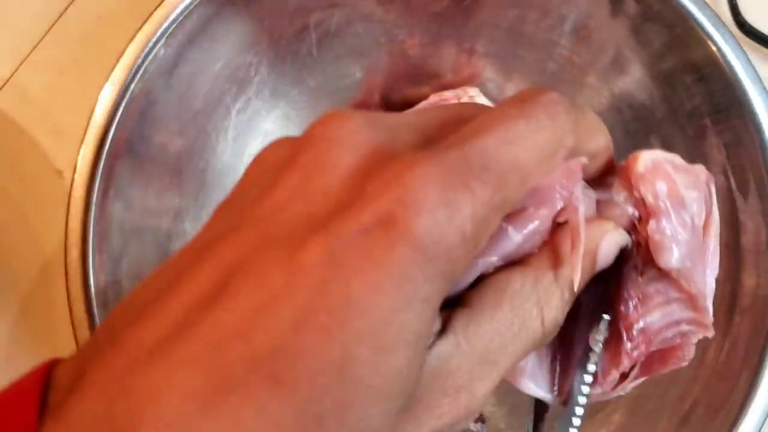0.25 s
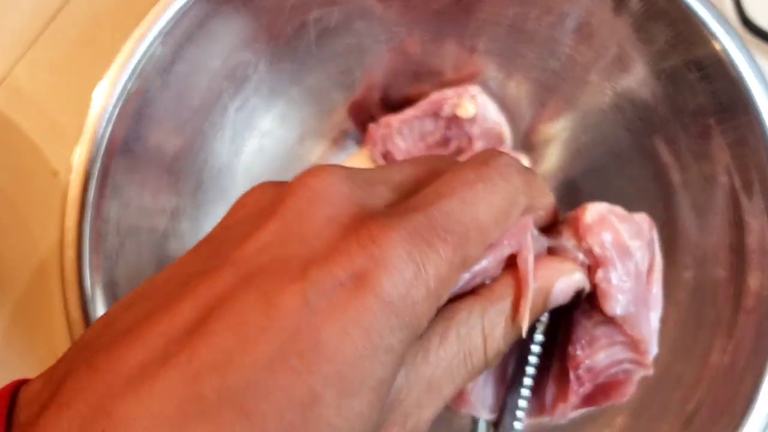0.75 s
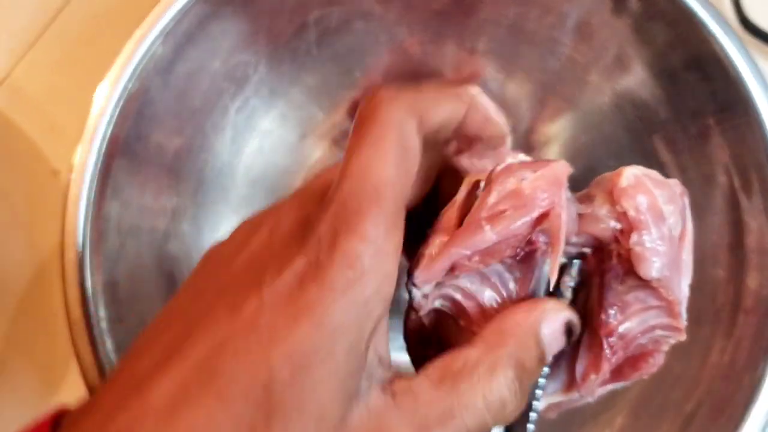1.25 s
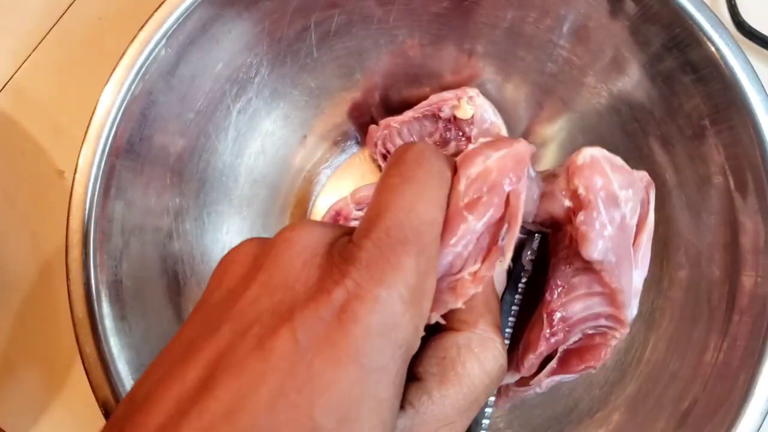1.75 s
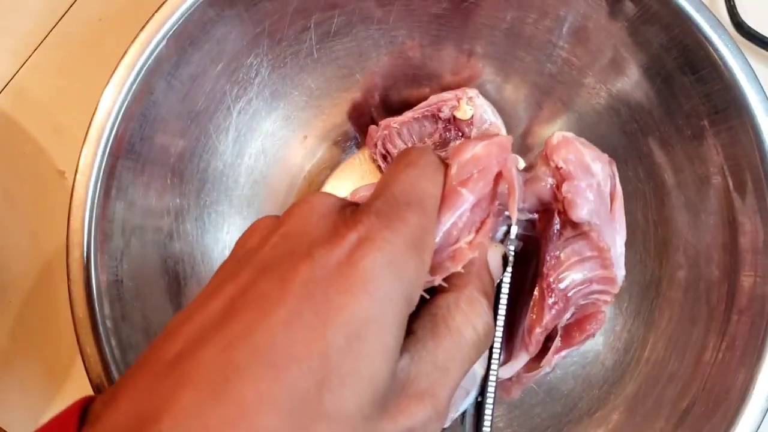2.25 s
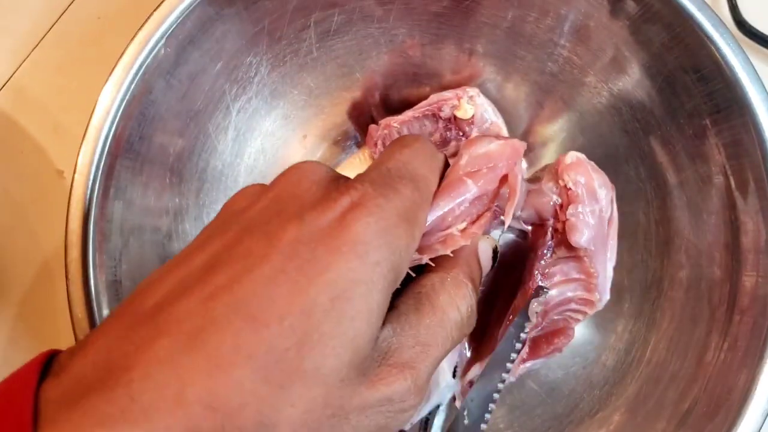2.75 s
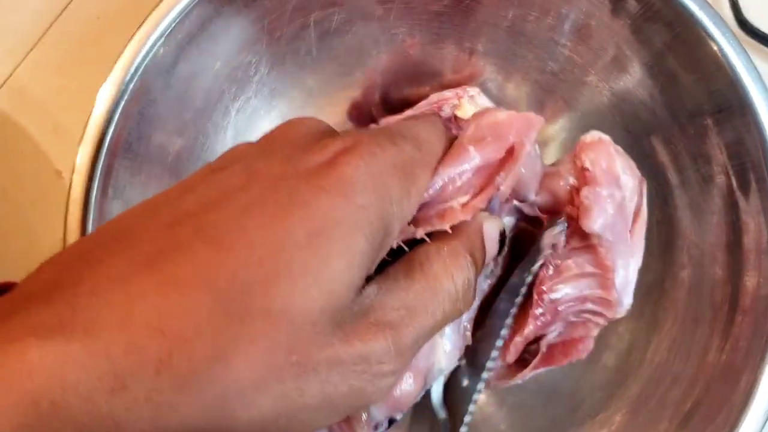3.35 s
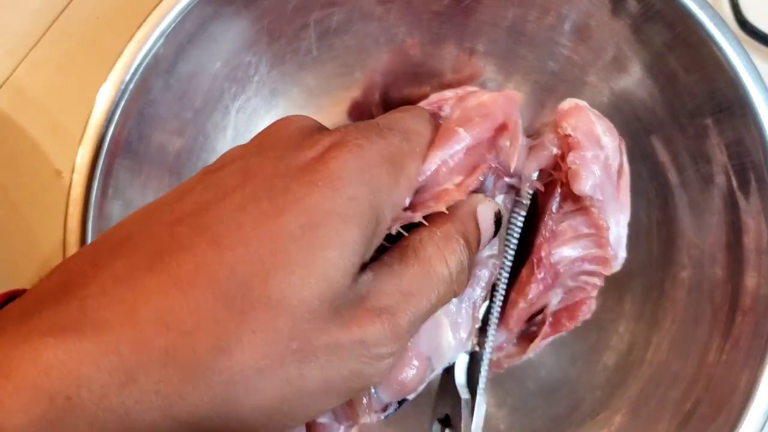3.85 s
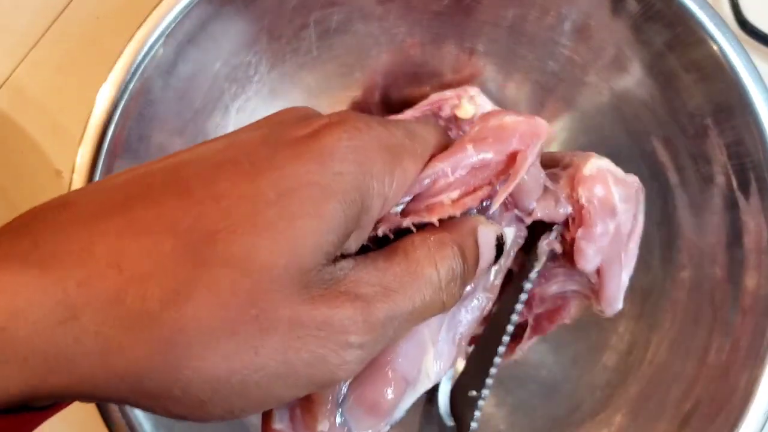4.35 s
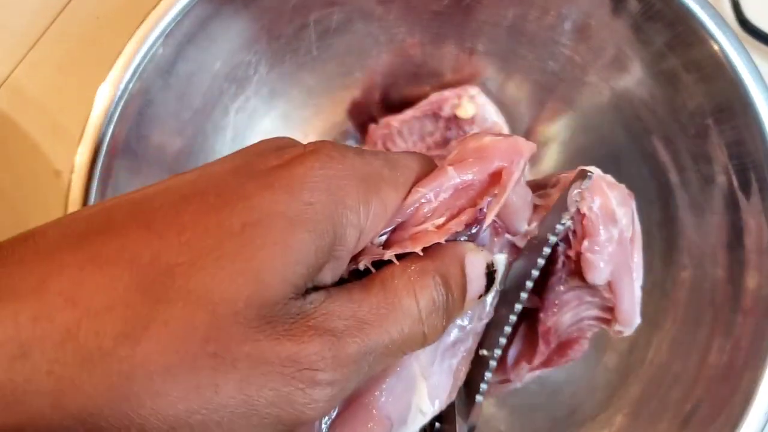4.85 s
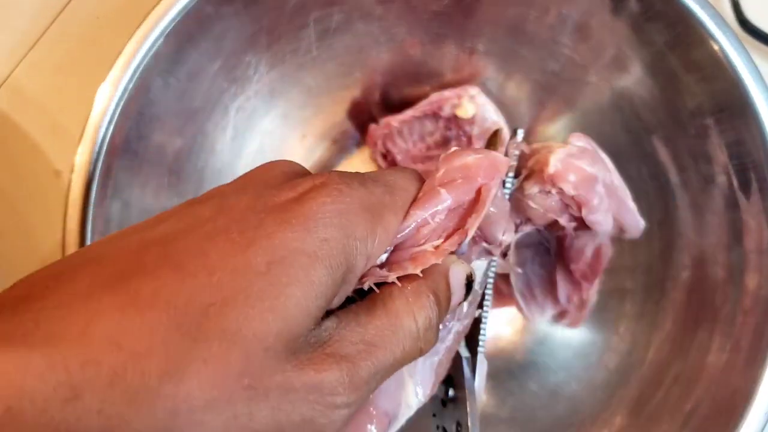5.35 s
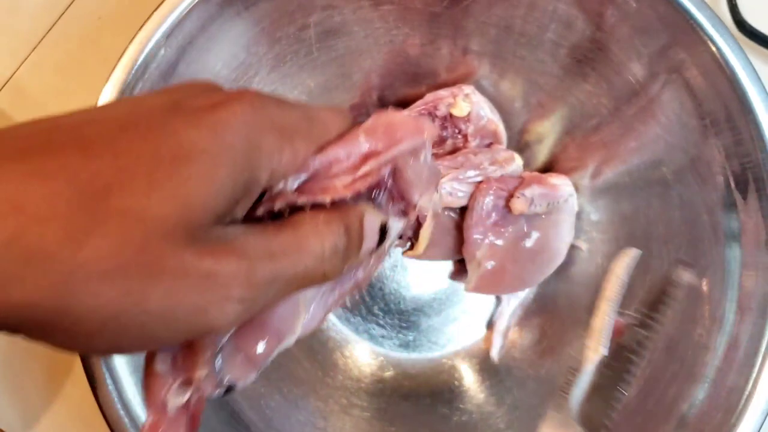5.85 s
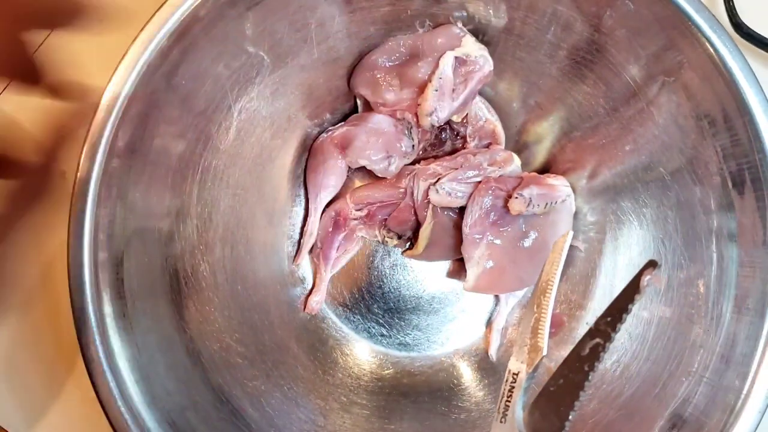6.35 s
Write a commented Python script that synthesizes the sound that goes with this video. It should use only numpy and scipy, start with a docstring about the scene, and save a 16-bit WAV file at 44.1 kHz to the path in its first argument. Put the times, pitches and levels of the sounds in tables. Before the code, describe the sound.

Close up in a small kitchen, shears cut a raw bird over a steel bowl. Bone crackles and ends in a sharp, loud snap; two more cuts follow with gristly crunches, small wet ticks and a final blade clack. A piece flops into the bowl, which rings briefly, and the rest of the bird drops softly beside it. Soft air and a low appliance hum run underneath.

```python
"""Cutting up a raw bird with kitchen shears

Over soft air and a motor's hum, three cuts crackle as bone gives, and each ends in a loud snap; wet flesh squishes.
The cut piece flops into a steel bowl and sets it ringing, then the rest of the bird drops beside it.
Cracks and squishes are shaped noise, thuds are damped pushes, and bone, blades and bowl are fading tones.
A small room's reflections surround the close sounds, and a limiter holds down the loudest moments."""
import sys
import numpy as np
from scipy import signal
from scipy.fft import rfft, irfft, next_fast_len
from scipy.io import wavfile
from scipy.ndimage import uniform_filter1d

SR = 44100
rng = np.random.default_rng(int(sys.argv[2]) if len(sys.argv) > 2 else 0)


def output_pcm(signal):
    """Save a mono or channel-first signal as 16-bit PCM at the path in sys.argv[1].

    Samples are clipped to [-1, 1] before scaling.
    """
    pcm = np.clip(np.atleast_2d(signal).T, -1, 1) * 32767
    wavfile.write(sys.argv[1], SR, np.round(pcm).astype(np.int16))


N = 291263  # length of the scene in samples
SIZE = 16384  # length of one short sound in samples
BINS = np.fft.rfftfreq(SIZE, 1 / SR)  # its frequencies in Hz
TIME = np.arange(SIZE) / SR  # its clock in seconds
MS = TIME * 1000  # the same clock in milliseconds

# The tone colour of splintering bone and wet friction.
# Each row: frequency in Hz, relative level in dB.
SPLINTER_COLOUR = [(40, -20), (100, -12.5), (250, -15), (420, -5.5), (650, -5), (1000, -10.5), (1800, -6),
                   (2300, 2), (2800, -3), (3600, -4.5), (6200, -4), (7500, -10), (9200, 6.5), (12000, 4),
                   (15500, -0.5)]
# The snap that ends each cut: the bone splits, and just after it the blades slam shut.
# Each row: start in seconds, relative level in dB, decay in ms, treble in dB, clack of the blades in dB,
# pitch of the clack as a ratio, how much earlier the split comes in ms, relative level of the split in dB.
CUT_SNAPS = [(2.5101, -7.5, 2.86, -7, -16, 1.14, 9.3, -30), (3.9560, -12, 2.6, -9, -17, 1, 5, -17),
             (5.4711, -12.5, 2.5, -11.5, -4.5, 1, 6.7, -20)]


def amp(db):
    """Turns decibels into a gain."""
    return 10 ** (np.asarray(db) / 20)


def unit(x):
    """Scales to an rms (average strength) of 1."""
    return x / np.sqrt(np.mean(x ** 2) + 1e-30)


def read(points, hz):
    """Reads a table of (Hz, value), joined by lines on a log-frequency axis."""
    f, value = np.transpose(points)
    return np.interp(np.log(hz + 1), np.log(f), value)


def add(mix, s, sound):
    """Mixes a sound in at time s, cutting it off at the end of the scene."""
    part = mix[:, round(s * SR):][:, :sound.shape[-1]]
    part += sound[..., :part.shape[1]]


def pan(db):
    """Gives left and right gains; db is how much louder the left is."""
    return amp(np.array([[db], [-db]]) / 2)


def pair(likeness, size=SIZE):
    """Makes two channels of white noise that are partly alike (0 = separate, 1 = the same)."""
    shared = rng.standard_normal(size)
    own = rng.standard_normal((2, size))
    likeness = np.clip(likeness, 0, 1)
    return np.sqrt(likeness) * shared + np.sqrt(1 - likeness) * own


def colour(x, gain):
    """Filters with the shape of gain on BINS, never sounding ahead of time; white noise keeps its power."""
    log_gain = np.log(np.maximum(unit(gain), 1e-5))
    circle = np.concatenate([log_gain, log_gain[-2:0:-1]])
    # the Hilbert transform finds the phase that makes the filter respond as early as it can
    response = np.exp(np.conj(signal.hilbert(circle)))[:len(BINS)]
    filtered = irfft(rfft(x) * response)
    return filtered * (TIME < TIME[-1] / 2)


def burst(envelope, likeness):
    """Makes noise under an envelope, with its energy spread evenly over frequency."""
    z = rfft(pair(likeness) * envelope)
    z /= np.sqrt(uniform_filter1d(abs(z) ** 2, size=280, axis=1) + 1e-12)
    return unit(irfft(z)) * np.sqrt(np.mean(envelope ** 2))


def splinter(grain_db, order):
    """An uneven gain that changes over about order samples, as fibres give one after another."""
    grain = unit(uniform_filter1d(rng.standard_normal(SIZE), size=order))
    return unit(amp(grain_db * grain))


def background(air_db=-77.5, air_pan_db=2, hum_pan_db=3):
    """Soft room air is shaped noise; an appliance motor hums in sines whose phase wanders slowly."""
    # Each row: frequency in Hz, relative level in dB per Hz.
    air_colour = [(25, -38.5), (40, -17.5), (55, -3.5), (80, -11.5), (130, -12.5), (280, -15.5),
                  (480, -18.5), (1100, -29), (2000, -31.5), (4500, -34.5), (7500, -44), (10000, -32.5),
                  (14800, -27.5), (16000, -37.5)]
    # Each row: frequency in Hz, likeness of left and right from 0 to 1.
    air_likeness = [(50, 1), (400, 0.28), (1500, 0.11), (5000, 0.038), (14000, .2)]
    # Each row: frequency in Hz, rms level in dB before panning.
    hum_lines = [(53.8, -70.5), (107.7, -85.5), (263.8, -88.5), (360.4, -77), (422, -89.5), (479.1, -91.5)]
    size = next_fast_len(N)
    hz = np.fft.rfftfreq(size, 1 / SR)
    t = np.arange(N) / SR

    left, other = rfft(rng.standard_normal((2, size)))
    same = np.clip(read(air_likeness, hz), 0, 1)
    right = same * left + np.sqrt(1 - same ** 2) * other
    z = np.array([left, right]) * amp(read(air_colour, hz))
    hiss_rms = irfft(z * (hz > 600), size).std()  # the air's level is set by its part above 600 Hz
    air = irfft(z, size)[:, :N] / hiss_rms * amp(air_db) * pan(air_pan_db)

    knots = np.linspace(0, t[-1], 30)
    hum = np.zeros(N)
    for line_hz, db in hum_lines:
        drift = np.interp(t, knots, np.cumsum(.5 * rng.standard_normal(len(knots))))
        hum += np.sqrt(2) * amp(db) * np.sin(2 * np.pi * line_hz * t + drift)
    return air + hum * pan(hum_pan_db)


def fractures():
    """Lists all bursts: start in s, level in dB, decay in ms, knock, treble and left-right balance in dB."""
    # Sharp cracks of bone, gristle and steel.
    # Each row: start in seconds, relative level in dB, decay in ms, treble in dB.
    sharp_cracks = [ (0.8492, -56.5, 2.14, -12), (1.9396, -52, 3, -9.5), (1.953, -41, 2.2, -8),
                    (1.978, -33, 2.3, -2.5), (2.015, -48, 4.5, -1.5), (2.0648, -48, 2.5, 5),
                    (2.07, -30.5, 3.2, -4), (2.122, -31, 6, -7.5), (2.1311, -30, 3.9, 4.5),
                    (3.6379, -23.5, 1.7, 4), (3.716, -32, 2.7, 0), (3.7784, -24.5, 2.9, 6.5),
                    (3.8048, -26, 5, 0.5), (3.8212, -25.5, 7, 0), (3.8314, -28, 1.3, 8.5),
                    (5.0339, -58.5, 3.9, 0), (5.5285, -34.5, 2.1, -4.5), (5.6105, -45, 1.8, -20.5),
                    (5.9459, -45, 4.8, 5)]
    # Wet ticks of tearing skin and flesh.
    # Each row: start in seconds, relative level in dB, treble in dB.
    wet_ticks = [(1.215, -53, 26), (3.073, -51.5, 19.5), (3.2757, -54, 4.5), (3.598, -48.5, 11),
                 (4.182, -39.5, 9), (4.217, -40.5, 8.5), (5.2706, -52.5, 9.5), (5.277, -46.5, 5.5),
                 (5.3205, -52.5, 4), (5.344, -36.5, 9.5), (5.3526, -37.5, 11), (5.373, -50.5, 10)]
    faint_lead_ms, faint_db = 2.3, -30.5  # a very faint crackle shortly before each split
    trail_ms, trail_db = 35, -12  # two weaker ticks trail each tick within this time

    for s, db, decay_ms, treble_db, _, _, lead_ms, split_db in CUT_SNAPS:
        split = 3, -4.5, 4.5, 11  # decay ms, then knock, treble and left-right dB
        yield s - (lead_ms + faint_lead_ms) / 1000, split_db + faint_db, *split
        yield s - lead_ms / 1000, split_db, *split
        yield s, db, decay_ms, -4, treble_db, 1
    for s, db, decay_ms, treble_db in sharp_cracks:
        knock_db = -2 - 0.83 * treble_db  # the duller a crack, the more it knocks
        yield s, db, decay_ms, knock_db, treble_db, 2
    for s, db, treble_db in wet_ticks:
        wet = 3.1, -1, treble_db, 5.5  # decay ms, then knock, treble and left-right dB
        yield s, db, *wet
        for late_ms in trail_ms * rng.random(size=2):
            yield s + late_ms / 1000, db + trail_db, *wet


def cracks(likeness=0.68, knock_hz=1150, treble_hz=6000, rise_ms=.3):
    """Each burst is a few milliseconds of splintering, coloured by bone and blades."""
    out = np.zeros((2, N))
    knock = 1 / (1 + (BINS / knock_hz) ** 4)
    treble = 1 - 1 / (1 + (BINS / treble_hz) ** 4)
    for s, db, decay_ms, knock_db, treble_db, pan_db in fractures():
        smooth = (1 - np.exp(-MS / rise_ms)) * np.exp(-MS / decay_ms)
        # the grain roughens the envelope but leaves its overall strength alone
        envelope = unit(smooth * splinter(grain_db=5.5, order=14)) * np.sqrt(np.mean(smooth ** 2))
        gain = amp(read(SPLINTER_COLOUR, BINS) + knock_db * knock + treble_db * treble)
        add(out, s, amp(db) * pan(pan_db) * colour(burst(envelope, likeness), gain))
    return out


def squishes(likeness=0.055, grain_db=5, pan_db=3, squeak_width=0.123):
    """Wet flesh sticks and slips: a grainy swell with one squeaky resonance over a broad hiss."""
    # Wet flesh sliding on the blades and bowl.
    # Each row: start in seconds, length in seconds, rising share of it, relative level in dB,
    # pitch of the squeak in Hz, broad hiss against the squeak in dB.
    slides = [(0.911, 0.07, 0.22, -67.5, 9650, 7), (1.841, 0.061, 0.49, -63.5, 10100, -4),
              (2.746, 0.073, 0.31, -63, 9880, 3), (3.549, 0.063, 0.42, -61.5, 9000, -5),
              (4.149, 0.076, .3, -57, 9600, 16), (5.519, 0.07, 0.091, -31.5, 5940, 0),
              (5.562, 0.15, 0.16, -48.5, 7060, 6.5), (5.733, .11, .5, -59.5, 6050, -6),
              (5.843, 0.114, .36, -62.5, 9520, 16), (6.16, 0.056, .7, -61, 9380, -5),
              (6.254, 0.07, 0.062, -47, 5450, -7), (6.251, 0.081, 0.17, -46, 9950, -18)]
    out = np.zeros((2, N))
    for s, length, rising, db, hz, hiss_db in slides:
        swell = np.interp(TIME / length, [0, np.clip(rising, .05, .95), 1], [0, 1, 0])
        # the width is a share of the squeak's pitch
        squeak = unit(1 / (1 + ((BINS - hz) / (squeak_width * hz)) ** 2))
        hiss = amp(hiss_db) * unit(amp(read(SPLINTER_COLOUR, BINS)))
        grains = burst(swell * splinter(grain_db, order=60), likeness)
        add(out, s, amp(db) * pan(pan_db) * colour(grains, np.hypot(squeak, hiss)))
    return out


def pushes(cycles=0.73, second_slap_db=-30.5):
    """Lists two pushes a thud: start in s, level in dB, pitch in Hz, time to swell in ms, wet slap in dB."""
    # Flesh landing on steel, and the dull jolt of the last snap; each is a first push and then a second.
    # When flesh lands, these are a quick touch and its weight settling.
    # Each row: start in seconds, relative level of the first in dB, its pitch in Hz, its wet slap in dB,
    # delay until the second in ms, relative level of the second in dB, its pitch in Hz.
    thuds = [(1.6996, -51, 440, -12, 26, -56, 146), (5.47, -42.5, 398.4, -25.5, 5.3, -47.5, 78),
             (5.5271, -21, 532, -18.5, 19.4, -41.5, 200.2), (5.6213, -34.5, 970, -2, 28, -63.5, 116),
             (5.687, -46, 364, -16, 13.3, -41.5, 140), (6.279, -36.5, 449, -11.5, 1.53, -38, 61.3),
             (6.2989, -34, 401, -10.5, 1, -38, 118), (6.331, -40, 364, -11, 22, -37.5, 63.5)]
    for s, first_db, first_hz, slap_db, delay_ms, second_db, second_hz in thuds:
        # strong damping: a push swells and fades again within a few cycles
        yield s, first_db, first_hz, 1000 * cycles / first_hz, slap_db
        yield s + delay_ms / 1000, second_db, second_hz, 1000 * cycles / second_hz, second_slap_db


def flops(slap_ms=4, slap_hz=1500, pan_db=1):
    """Flops of soft meat and the last snap's jolt: damped pushes of a few cycles, with a small slap."""
    out = np.zeros((2, N))
    for s, db, hz, swell_ms, slap_db in pushes():
        u = MS / swell_ms
        push = u * np.exp(1 - u) * np.sin(2 * np.pi * hz * TIME)
        slap = colour(burst(np.exp(-MS / slap_ms), 0.16), 1 / (1 + (BINS / slap_hz) ** 2))
        add(out, s, amp(db) * pan(pan_db) * (push + amp(slap_db) * slap))
    return out


def shudder(level_db=-17, decay_ms=45, corner_hz=420, pan_db=2):
    """Each push shakes bowl and counter in a dull, uneven rumble; slower pushes shake more."""
    out = np.zeros((2, N))
    gain = BINS / (BINS + 40) / (1 + (BINS / corner_hz) ** 4)
    for s, db, _, swell_ms, _ in pushes():
        strength = amp(db + level_db) * np.sqrt(swell_ms / 10)
        rumble = colour(pair(0.69) * np.exp(-MS / decay_ms), gain)
        add(out, s, strength * pan(pan_db) * rumble)
    return out


def clacks(pan_db=4, port_turn=0.055):
    """Each knock of bone or click of shears rings briefly, slightly out of step at the two microphone ports."""
    # Bone giving way or knocking on the steel, and a click of the shears.
    # Each row: start in seconds, relative level in dB, pitch in Hz.
    knocks = [(2.1217, -26, 1480), (2.5102, -23, 1200), (3.8048, -20.5, 1555), (5.9459, -52, 2970),
              (6.3005, -29.5, 1010)]
    # What these knocks ring with. Each row: multiple of the pitch, width in Hz, relative level in dB.
    knock_modes = [(1, 290, 2), (.43, 140, -15)]
    # What the shears ring with as they slam shut, before the ratio of each clack.
    # Each row: pitch in Hz, width in Hz, relative level in dB.
    shear_modes = [(460, 230, -16), (2230, 160, -1.5), (2720, 350, -9), (3410, 400, -2.5),
                   (4900, 820, -11.5)]
    out = np.zeros((2, N))
    rings = []
    for s, db, hz in knocks:
        for ratio, width_hz, mode_db in knock_modes:
            rings.append((s, db + mode_db, hz * ratio, width_hz))
    for s, _, _, _, db, ratio, _, _ in CUT_SNAPS:
        for hz, width_hz, mode_db in shear_modes:
            rings.append((s, db + mode_db, hz * ratio, width_hz))
    for s, db, hz, width_hz in rings:
        phase = port_turn * rng.standard_normal((2, 1))  # in cycles
        fade = np.exp(-np.pi * width_hz * TIME)  # a wider resonance dies sooner
        onset = 1 - np.exp(-hz * TIME)
        ring = fade * onset * np.sin(2 * np.pi * (hz * TIME + phase))
        add(out, s, amp(db) * pan(pan_db) * ring)
    return out


def bowl(pan_db=3):
    """The struck steel rings in fading modes, some close in pitch; the loaded bowl bobs after each drop."""
    # Pitches of the bowl's modes in Hz.
    mode_hz = [420, 479, 759, 1836, 1890, 5733, 6002]
    # How each mode rings freely, in the same order.
    # Each row: relative level in dB, time to fall by 60 dB in seconds.
    mode_ring = [(-22.5, 3.95), (-27.5, 2.53), (-29.5, 2.04), (-2, 0.62), (-3, 0.68), (-25, 0.8),
                 (-11.5, 0.75)]
    # Blows on the bowl; meat lying on the steel shortens the ring.
    # Each row: start in seconds, relative level in dB, ring length as a share of the free ring.
    blows = [(5.528, -45, 1), (6.256, -63, .5)]
    # The loaded bowl bobbing on the counter. Each row: start in seconds, relative level in dB.
    bobs = [(5.772, -58), (6.363, -44.5)]
    # Its two ways of bobbing. Each row: pitch in Hz, relative level in dB, time to fall by 60 dB in seconds.
    bob_modes = [(57.7, -3, 0.95), (66.24, -4, 0.69)]
    out = np.zeros((2, N))
    t = np.arange(SR) / SR
    for s, blow_db, share in blows:
        for hz, (db, t60) in zip(mode_hz, mode_ring):
            phase = rng.random() + rng.random((2, 1)) / 4  # left and right up to a quarter cycle apart
            fade = np.exp(-np.log(1000) * t / (t60 * share))
            add(out, s, amp(blow_db + db) * fade * np.sin(2 * np.pi * (hz * t + phase)))
    for s, bob_db in bobs:
        for hz, db, t60 in bob_modes:
            fade = np.exp(-np.log(1000) * t / t60)
            add(out, s, amp(bob_db + db) * fade * np.sin(2 * np.pi * hz * t))
    return out * pan(pan_db)


def kitchen(x, gap_ms=0.28, build_ms=4, early_db=3, early_ms=12):
    """Quick reflections from bowl and counter merge into the short tail of a small room."""
    # Each row: frequency in Hz, time for the echoes to fall by 60 dB in seconds.
    room_t60 = [(150, 0.65), (600, 0.24), (1300, 0.2), (2200, 0.28), (3000, 0.3), (5000, 0.28),
                (10000, 0.27), (16000, 0.15)]
    # How strongly the room answers. Each row: frequency in Hz, relative level in dB.
    room_send = [(100, -14.5), (500, -2), (1400, -6), (2300, -8), (3200, -6.5), (5000, -6), (7500, -7.5),
                 (10000, -10), (16000, -5)]
    ms = np.arange(SR) * 1000 / SR
    build = 1 - np.exp(-np.maximum(ms - gap_ms, 0) / build_ms)
    strength = build * (1 + amp(early_db) * np.exp(-ms / early_ms))
    # random echoes on a quarter of the samples
    taps = rng.standard_normal((2, SR)) * (rng.random((2, SR)) < .25) * strength
    hz, t, z = signal.stft(taps, SR, nperseg=256)
    z *= np.exp(-np.log(1000) * t / read(room_t60, hz)[:, None])
    # even out the total energy over frequency before colouring
    z /= np.sqrt(uniform_filter1d((abs(z) ** 2).sum(2, keepdims=True), size=3, axis=1))
    tail = signal.istft(z, SR, nperseg=256)[1]
    coloured = signal.istft(z * amp(read(room_send, hz))[:, None], SR, nperseg=256)[1]
    return signal.fftconvolve(x, coloured / np.linalg.norm(tail[0]), axes=1)[:, :N]


def ports(x, lag_ms=0.021, rumble_hz=200, rumble_db=4, rumble_turn=0.72):
    """Of two microphone ports, the left one hears sooner, and more of the rumble."""
    size = next_fast_len(N + SIZE)
    hz = np.fft.rfftfreq(size, 1 / SR)
    left, right = rfft(x, size)
    rumble = 1 / (1 + (hz / rumble_hz) ** 2)
    turn = 2 * np.pi * hz * lag_ms / 1000 + rumble_turn * rumble  # in radians
    # each port takes half of the difference, in opposite directions
    lead = amp(rumble_db * rumble / 2) * np.exp(.5j * turn)
    return irfft(np.array([left * lead, right / lead]), size)[:, :N]


def scene(crack_db=2.5, flop_room_db=-5, ring_room_db=-4):
    """The cutting and the bowl, close by, with the kitchen around them."""
    cutting = amp(crack_db) * cracks() + clacks() + squishes()
    thuds, ring = flops(), bowl()
    room = kitchen(cutting + amp(flop_room_db) * thuds + amp(ring_room_db) * ring)
    # the direct ring has its own left-right phases and skips the ports
    return ports(cutting + thuds + shudder() + room + background()) + ring


def record(dry, threshold_db=-19, squeeze=0.59, edge_hz=15700):
    """A fast limiter holds down the loudest moments; then a filter removes the highest treble."""
    power = abs(uniform_filter1d((dry ** 2).mean(0), size=130))  # averaged over about 3 ms
    power_db = 10 * np.log10(power + 1e-12)
    over_db = uniform_filter1d(np.maximum(power_db - threshold_db, 0), size=130)
    limited = dry * amp(-squeeze * over_db)
    low_pass = signal.firwin(255, edge_hz, window=("kaiser", 8), fs=SR)
    return signal.oaconvolve(limited, low_pass[None], "same")


dry = scene()
out = record(dry)
output_pcm(out)
```